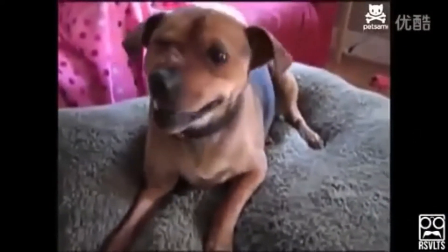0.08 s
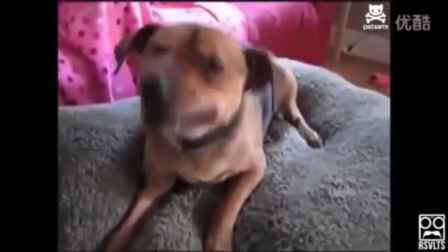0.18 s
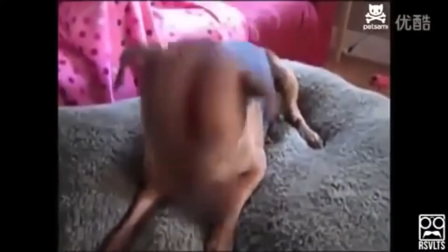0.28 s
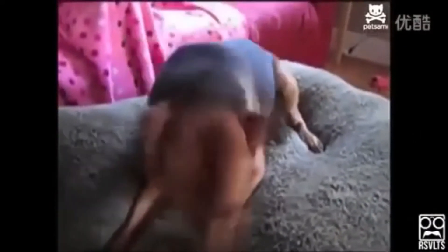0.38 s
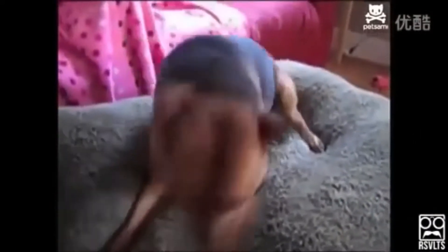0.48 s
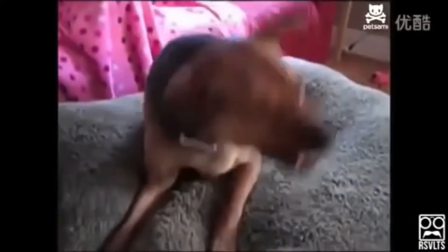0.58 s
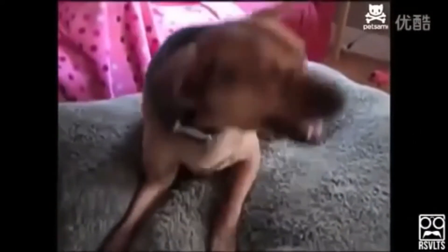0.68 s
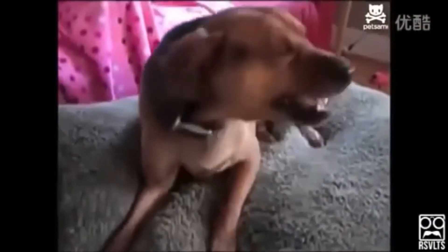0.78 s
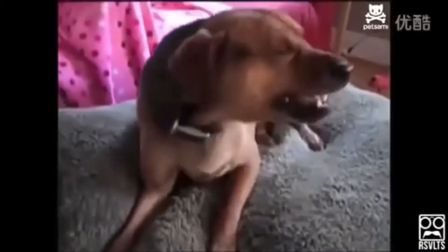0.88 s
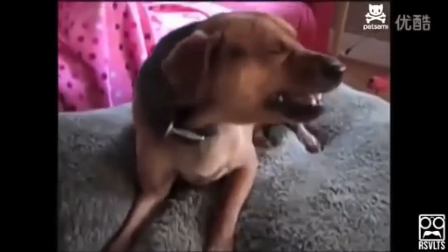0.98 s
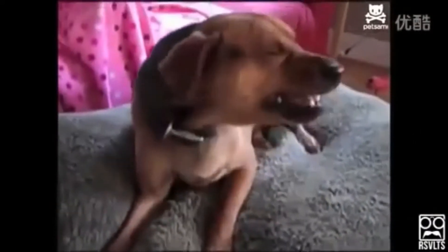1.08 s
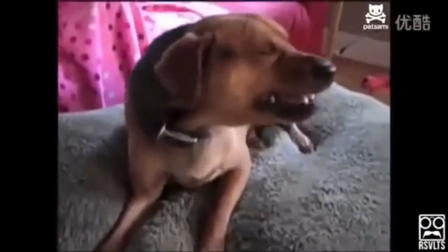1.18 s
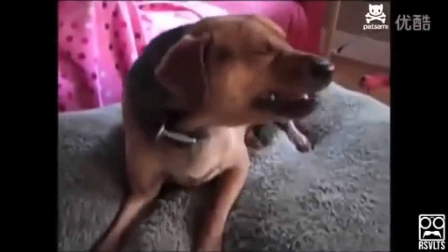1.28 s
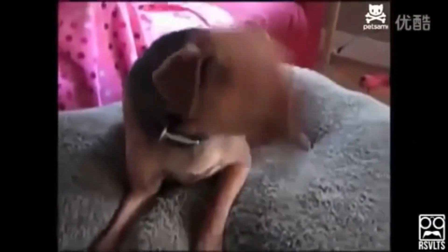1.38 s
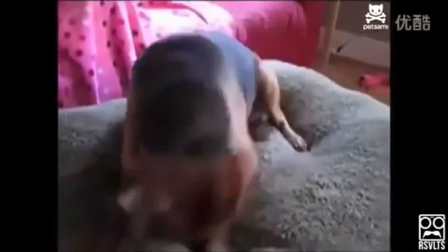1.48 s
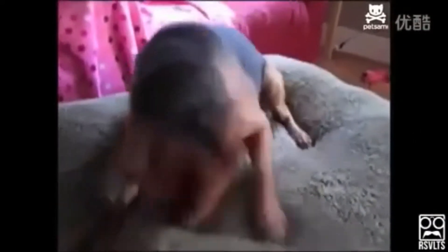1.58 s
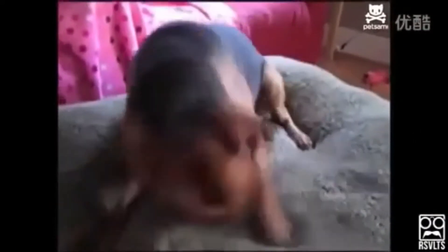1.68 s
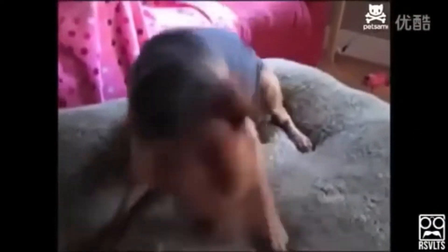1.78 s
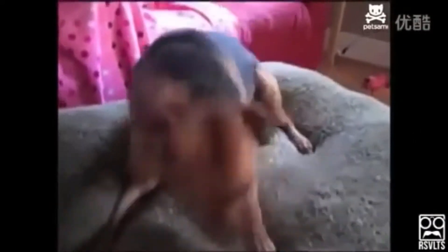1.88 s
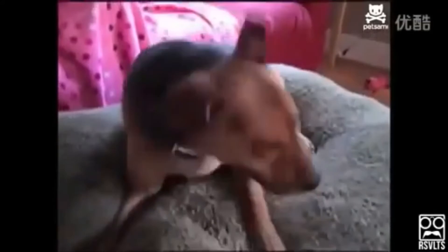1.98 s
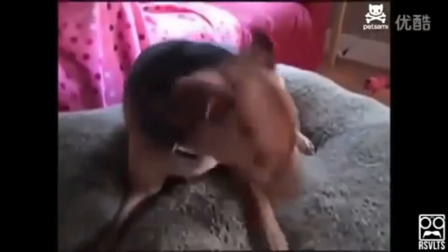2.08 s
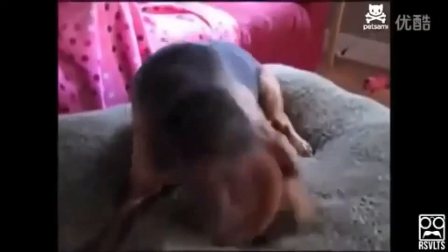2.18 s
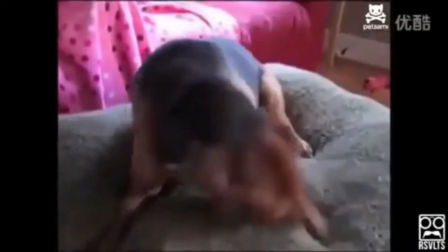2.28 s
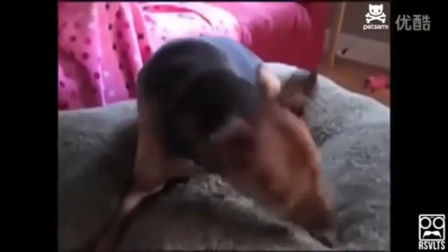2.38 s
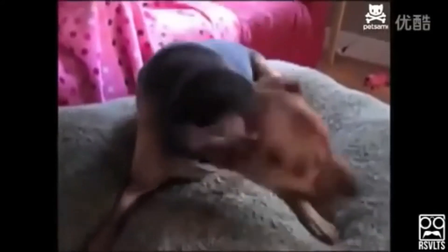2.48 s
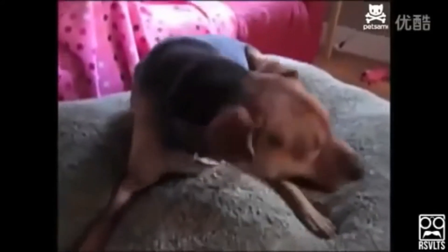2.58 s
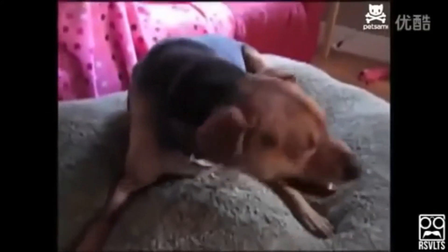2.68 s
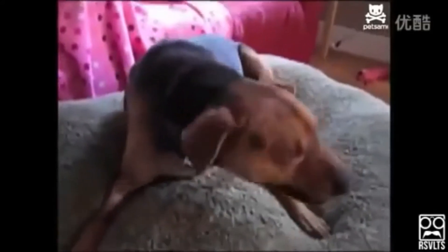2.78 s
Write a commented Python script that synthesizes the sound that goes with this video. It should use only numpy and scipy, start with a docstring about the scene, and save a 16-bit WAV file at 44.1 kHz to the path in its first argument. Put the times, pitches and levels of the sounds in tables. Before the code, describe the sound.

Close up in a quiet small room, a dog gives one breathy sneeze, pauses nearly a second, then blasts two more, each with a short grunt and wet lip flapping, ending in snuffles and a tooth click.

```python
"""A dog on a soft bed sneezes three times, close to the microphone in a small quiet room.
Each sneeze is noise for the air blast through muzzle and nose, chopped by the flutter of lips and throat;
a short grunt sounds soon after it starts, wet slaps ring the mouth and brief whistles sing in the air.
Around the blasts the dog sniffs and snuffles (swells of coloured noise), its teeth clack (clusters of
tiny ringing contacts) and its body bumps the bed (low noise), over a faint low room background."""
import sys
import numpy as np
from scipy import signal
from scipy.fft import rfft, irfft, next_fast_len
from scipy.io import wavfile
from scipy.ndimage import uniform_filter1d

SR = 44100
rng = np.random.default_rng(int(sys.argv[2]) if len(sys.argv) > 2 else 0)


def wrap_up_sound(samples):
    """Save the sound to the file named by the first command line argument, as 16-bit audio."""
    columns = np.atleast_2d(samples).T
    # keep every value between -1 and 1, then stretch to whole-number steps
    tamed = np.clip(columns, -1, 1)
    steps = np.round(tamed * 32767).astype(np.int16)
    wavfile.write(sys.argv[1], SR, steps)


N = 123480  # length of the scene in samples


def amp(db):
    """Decibels to gain."""
    return 10 ** (np.asarray(db) / 20)


def unit(x):
    """Scales to rms 1."""
    return x / np.sqrt(np.mean(x ** 2) + 1e-20)


def read(points, hz):
    """Reads a table on a log-frequency axis."""
    f, value = np.transpose(points)
    return np.interp(np.log(hz + 1), np.log(f + 1), value)


def add(mix, start, sound):
    """Mixes a sound in at a start time in seconds."""
    part = mix[max(round(start * SR), 0):][:len(sound)]
    part += sound[:len(part)]


def colour(x, points):
    """Causal minimum-phase filter with the given spectrum; the result has rms 1."""
    log_gain = np.log(amp(read(points, abs(np.fft.fftfreq(4096, 1 / SR)))))
    taps = np.fft.ifft(np.exp(np.conj(signal.hilbert(log_gain)))).real
    return unit(signal.fftconvolve(x, taps[:len(taps) // 2])[:len(x)])


def clock(length):
    """Sample times in seconds from zero up to length."""
    return np.arange(0, length, 1 / SR)


def noise(t):
    """White noise as long as t."""
    return rng.standard_normal(len(t))


def arch(t, skew=1):
    """A smooth swell and fall over t; skew under 1 peaks early."""
    return np.sin(np.pi * (np.arange(len(t)) / len(t)) ** abs(skew))


def steady(x, size=900):
    """Evens out slow chance swells, so that the air flow sets the level."""
    return x / np.sqrt(abs(uniform_filter1d(x ** 2, size)) + 1e-6)


def shifting(x, depth_db):
    """The passages change shape: patches about 500 Hz wide swell and sink within some 20 ms."""
    spectrogram = signal.stft(x, nperseg=256, noverlap=192)[2]
    field = rng.standard_normal(spectrogram.shape)
    field = uniform_filter1d(field, size=3, axis=0)
    field = unit(uniform_filter1d(field, size=14, axis=1))
    moved = signal.istft(spectrogram * amp(depth_db * field), nperseg=256, noverlap=192)[1]
    return steady(moved[:len(x)])


def ring(modes, size=2400):
    """Response of a set of modes to one tap, each a sine that dies away; peak 1."""
    t = np.arange(size) / SR
    out = sum(amp(db - 60 * t / t60) * np.sin(2 * np.pi * hz * t) for hz, db, t60 in modes)
    return out / abs(out).max()


def glide(t, first_hz, last_hz):
    """Phase in radians of a pitch that moves in a straight line."""
    return 2 * np.pi * np.cumsum(np.linspace(first_hz, last_hz, len(t))) / SR


def swell(start, length, db, spectrum):
    """A soft swell and fall of coloured noise."""
    t = clock(length)
    return start, amp(db) * arch(t) * colour(noise(t), spectrum)


def spread(middle, side, width):
    """Left and right from a middle and a side signal."""
    return np.array([middle + width * side, middle - width * side])


# Colour of the room's background. Each row: frequency in Hz, level in dB.
FLOOR_COLOUR = [(12, -59.5), (20, -37.5), (42, -25.5), (57, -6), (82, -3.5), (164, -14.5), (183, -11.5),
                (470, -17.5), (620, -19.5), (1170, -22), (2690, -36.5), (6530, -39), (7300, -41),
                (15000, -47.5)]
FLOOR_DB, FLOOR_WIDTH = -45.5, 0.12


def background():
    """The low, steady bed of noise in a quiet room, nearly the same left and right."""
    middle, side = [colour(z, FLOOR_COLOUR) for z in rng.standard_normal((2, N))]
    return amp(FLOOR_DB) * spread(middle, side, FLOOR_WIDTH)


# Faint puffs of air at the nostrils. Each row: start in seconds, length in seconds, level in dB.
SNIFFS = [(0.063, 0.031, -60.5), (0.1, 0.15, -48), (1.358, 0.073, -57.5)]
# Colour of the nose hiss, in sniffs and sneezes. Each row: frequency in Hz, level in dB.
NOSE_COLOUR = [(3500, -42), (4900, -11), (5500, -9), (6400, 0.5), (7300, -0.5), (8200, -3), (9100, -10),
               (10100, -14), (10700, -19.5), (12500, -21), (14500, -32)]


def sniff(start, length, db):
    """A little air hisses through the narrow nostrils."""
    return swell(start, length, db, NOSE_COLOUR)


# Snuffles around the sneezes.
# Each row: start in seconds, length in seconds, level in dB, brightness in dB per octave.
SNUFFLES = [(0.111, 0.19, -46, 2.5), (0.435, 0.095, -32.5, 2.5), (0.524, 0.099, -28.5, 0.1),
            (0.579, 0.29, -43, -2.5), (1.89, 0.22, -32, 0.6), (1.999, 0.25, -35, 1.5),
            (2.407, 0.18, -36.5, -0.5), (2.465, 0.14, -33, -0.6)]
# Colour of a snuffle before the brightness tilt. Each row: frequency in Hz, level in dB.
SNUFFLE_COLOUR = [(59, -26), (100, -3), (171, -6.5), (425, -1.5), (523, -7), (993, 1), (1270, -8),
                  (1920, -6), (2320, -0.5), (3730, -6.5), (5520, -8.5), (7850, -7), (14000, -38.5)]
TILT_PIVOT_HZ, SNUFFLE_SKEW, SNUFFLE_SHIFT_DB = 1000, 0.55, 2.7


def snuffle(start, length, db, tilt_db):
    """Air drawn softly through the wet muzzle."""
    t = clock(length)
    spectrum = [(hz, level + tilt_db * np.log2(hz / TILT_PIVOT_HZ)) for hz, level in SNUFFLE_COLOUR]
    air = shifting(colour(noise(t), spectrum), SNUFFLE_SHIFT_DB)
    return start, amp(db) * arch(t, SNUFFLE_SKEW) * air


# Wet slaps of the lips and jowls, and at 0.488 s the low knock of the jaw under a teeth clack, which rings the
# mouth the same way. Each row: start in seconds, peak level in dB.
SLAPS = [(0.117, -25.5), (0.2164, -19), (0.2327, -12.5), (0.3045, -13), (0.3241, -9.5), (0.356, -8),
         (0.362, -17), (.397, -12.5), (0.4227, -12.5), (.488, -18), (1.5321, -12.5), (1.547, -10),
         (1.560, -4), (1.61, -7.5), (1.6452, -5), (1.6563, -3.5), (1.7175, -8), (1.8007, -14.5),
         (2.255, -13), (2.272, -13.5), (2.282, -8), (2.353, -15.5)]
# Modes of the mouth at its middle size. Each row: frequency in Hz, level in dB, t60 in seconds.
MOUTH_MODES = [(169, -27.5, .03), (414, -7, 0.014), (754, -4, 0.0081), (1278, -2, 0.0033),
               (1800, -4, 0.017)]
SLAP_SOFT_S = 0.00047  # length of the soft landing
MOUTH_VARIATION = 0.094  # rms spread of each mode's pitch, as a log ratio


def slap(start, db):
    """Soft wet tissue lands and rings the mouth, a little differently each time."""
    ratios = np.exp(MOUTH_VARIATION * rng.standard_normal(len(MOUTH_MODES)))
    modes = [(hz * ratio, level, t60) for (hz, level, t60), ratio in zip(MOUTH_MODES, ratios)]
    sound = np.convolve(ring(modes), arch(clock(SLAP_SOFT_S)))
    return start, amp(db) * sound / abs(sound).max()


# Level curves, one table per sneeze. Each row: time in seconds, lip flutter in dB, throat rasp in dB,
# muzzle rush in dB, nose hiss in dB.
FIRST_SNEEZE = [(0.205, -45.5, -58, -42.5, -42), (0.235, -29, -30.5, -32.5, -29),
                (0.255, -28.5, -35.5, -19, -16), (0.279, -33, -34.5, -15.5, -12.5),
                (0.305, -24.5, -31, -16.5, -14), (0.33, -23.5, -31, -22, -19.5),
                (0.351, -39, -35.5, -25, -22), (0.355, -25, -23.5, -22.5, -23),
                (0.423, -33, -37, -30, -28.5), (0.443, -31.5, -49, -58, -41), (0.47, -44.5, -35, -31, -37)]
SECOND_SNEEZE = [(1.432, -48.5, -69, -61, -41), (1.452, -31, -76, -48, -43), (1.461, 3.5, -48, -32, -15.5),
                 (1.481, -1.5, -26, -27.5, -20), (1.506, -37.5, -33, -29.5, -28),
                 (1.511, -27.5, -22, -17, -14), (1.531, -17, -10.5, -21, -15),
                 (1.575, -21.5, -16.5, -23.5, -17.5), (1.594, -32.5, -26, -23.5, -14),
                 (1.632, -17, -27, -25.5, -18.5), (1.644, -19.5, -17.5, -20.5, -24),
                 (1.7, -22.5, -32, -30.5, -27.5), (1.722, -25.5, -24.5, -24, -20),
                 (1.794, -22, -35, -26.5, -26.5), (1.825, -27.5, -43, -26, -21.5),
                 (1.878, -37.5, -42, -27.5, -21), (1.895, -40, -48, -38, -31), (1.92, -47, -60, -45, -36)]
THIRD_SNEEZE = [(2.12, -50, -48, -28, -34), (2.134, -5, -45, -43, -29), (2.155, -28.5, -36, -25.5, -23),
                (2.174, -37, -28.5, -18, -14.5), (2.189, -23, -32, -18.5, -21), (2.205, -22, -38, -17, -12),
                (2.23, -23.5, -28, -20, -19.5), (2.249, -29, -28.5, -28, -18.5),
                (2.272, -20, -27, -22, -26.5), (2.296, -22.5, -26.5, -25, -21),
                (2.349, -32.5, -37.5, -28, -21), (2.39, -39, -46, -34, -35.5)]
# Flutter, one row per sneeze. Each row: pulses per second at the start and at the end, before jitter,
# fade-in of the lip flutter in seconds.
FLUTTER = [(148.34, 90, 0.087), (230.85, 95, 0.082), (169.7, 100, 0.035)]
# Colours of lips and throat. Each row: frequency in Hz, level in dB.
LIP_COLOUR = [(25, -44.5), (50, -29), (78, -0.5), (105, -2), (160, -6), (230, -1), (300, -4.5), (410, 5),
              (520, -6.5), (650, -6), (900, -11.5), (2000, -50.5)]
THROAT_COLOUR = [(350, -29), (620, -0.5), (880, 2), (1070, 1.5), (1200, -8.5), (1420, -2), (1750, -5),
                 (2100, -23), (3500, -36.5)]
# Colours of the muzzle rush, one list per sneeze. Each row: frequency in Hz, level in dB.
MUZZLE_COLOURS = [
    [(1060, -21), (1800, -5.5), (2430, -1), (2640, -7), (3260, -2), (3810, -9), (3900, -0.5), (4700, -1),
     (5400, -10), (7020, -27.5), (11900, -120)],
    [(1060, -32), (1800, -5), (2030, -4), (2240, -1.5), (2510, -1.5), (2840, 0.5), (3120, 2.5),
     (4270, -4.5), (5400, -0.5), (7020, -42), (11900, -120)],
    [(1060, -15), (1800, -10.5), (1970, -3), (2560, -3), (3050, -1), (3170, -3.5), (3440, -2), (3970, -5),
     (5400, -5), (7020, -13), (11900, -120)],
]
FLUTTER_JITTER, FLAP_VARIATION = .3, .35  # rms, as log ratios of rate and of flap strength
LIP_AIR, THROAT_AIR = 0.61, 0.9  # noise mixed with the flaps
LIP_DEPTH, THROAT_DEPTH, AIR_DEPTH = 2.7, 1.5, 0.25  # how far each puff lifts the noise
PUFF_DECAY_S, BLAST_EDGE_S = 0.0099, 0.0085
SHIFT_DB = 4.5  # how far the resonances of the wet passages come and go, rms
HISS_SHIFT_DB = 2  # the nose changes shape less than the mouth


def sneeze(curve, flutter, muzzle_colour):
    """Uneven flaps of soft tissue ring lips and throat, and chop the air rushing through muzzle and nose."""
    times, *levels = np.transpose(curve)
    t = np.arange(times[0], times[-1], 1 / SR)
    first_hz, last_hz, lip_fade_s = flutter
    jitter = unit(uniform_filter1d(noise(t), size=200))
    rate = np.geomspace(first_hz, last_hz, len(t)) * np.exp(FLUTTER_JITTER * jitter)
    turns = np.cumsum(rate) / SR
    # one click per turn, each of a different strength
    flaps = unit(np.diff(np.floor(turns), prepend=0) * np.exp(FLAP_VARIATION * noise(t)))
    puffs = np.exp(-(turns % 1) / rate / PUFF_DECAY_S)

    def chopped(depth):
        """Air noise that jumps up with each flap and dies away."""
        return unit((1 + depth * puffs) * noise(t))

    lip_fade = np.clip((t - t[0]) / lip_fade_s, 0, 1) ** 4
    lips = steady(colour(flaps + LIP_AIR * chopped(LIP_DEPTH), LIP_COLOUR)) * lip_fade
    throat = shifting(colour(flaps + THROAT_AIR * chopped(THROAT_DEPTH), THROAT_COLOUR), SHIFT_DB)
    rush = shifting(colour(chopped(AIR_DEPTH), muzzle_colour), SHIFT_DB)
    hiss = shifting(colour(chopped(AIR_DEPTH), NOSE_COLOUR), HISS_SHIFT_DB)
    parts = lips, throat, rush, hiss
    blast = sum(part * amp(np.interp(t, times, db)) for part, db in zip(parts, levels))
    edges = np.minimum(np.minimum(t - t[0], t[-1] - t) / BLAST_EDGE_S, 1)
    return times[0], edges * blast


# Soft bumps on the bed. Each row: start in seconds, length in seconds, level in dB.
BUMPS = [(0.214, 0.089, -33), (0.461, 0.076, -39.5), (0.641, 0.066, -50), (1.057, 0.13, -45.5),
         (1.761, 0.095, -27), (2.265, 0.058, -38), (2.61, 0.17, -43.5)]
# Colour of the bed. Each row: frequency in Hz, level in dB.
BED_COLOUR = [(25, -33), (50, -14), (72, -1), (110, -6.5), (170, -20.5), (400, -37), (1500, -49.5)]


def bump(start, length, db):
    """The soft bed gives way under the body with a low, dull swell."""
    return swell(start, length, db, BED_COLOUR)


# Fuzzy whistles in the air stream. Each row: start in seconds, length in seconds, start pitch in Hz,
# end pitch in Hz, width in Hz, level in dB.
WHISTLES = [(0.234, 0.017, 4710, 5340, 500, -28), (.238, 0.031, 1900, 1710, 111, -21.5),
            (0.251, 0.039, 4900, 4200, 560, -12), (0.277, 0.042, 5200, 5700, 600, -19.5),
            (.32, 0.022, 1410, 1760, 164, -19), (1.271, 0.029, 6580, 7480, 593, -59.5),
            (1.52, 0.072, 900, 950, 120.4, -22), (1.528, 0.015, 1810, 1700, 160, -20.5),
            (1.562, 0.03, 1080, 1300, 100, -21.5), (1.924, 0.12, 3300, 2914, 700, -31),
            (2.116, 0.012, 3000, 3210, 220, -22.5), (2.19, 0.042, 2900, 2300, 302, -26.5),
            (2.28, 0.032, 710, 835, 166.7, -22)]


def whistle(start, length, first_hz, last_hz, width_hz, db):
    """A narrow gap makes the air sing briefly around a gliding pitch."""
    t = clock(length)
    pole = np.exp(-2 * np.pi * abs(width_hz) / SR)
    # slow complex noise blurs the pitch on both sides
    wander = signal.lfilter([1], np.poly([pole, pole]), noise(t) + 1j * noise(t))
    tone = (wander * np.exp(1j * glide(t, first_hz, last_hz))).real
    return start, amp(db) * arch(t) * unit(tone)


# Grunts as the throat opens. Each row: start in seconds, length in seconds, start pitch in Hz,
# end pitch in Hz, level of the fundamental in dB.
GRUNTS = [(.235, 0.037, 174, 156.2, -25.5), (1.463, 0.016, 407, 250, -9.5), (1.482, 0.092, 277, 260, -26),
          (2.141, 0.028, 388, 464, -19), (2.145, 0.036, 222, 221, -18), (2.514, 0.016, 344, 319.5, -32)]
GRUNT_OVERTONE_DB, GRUNT_SKEW = -25.5, 0.77


def grunt(start, length, first_hz, last_hz, db):
    """A few nearly pure cycles from the throat behind a shut mouth."""
    t = clock(length)
    phase = glide(t, first_hz, last_hz)
    tone = np.sin(phase) + amp(GRUNT_OVERTONE_DB) * np.sin(2 * phase)
    return start, amp(db) * arch(t, GRUNT_SKEW) * tone


# Teeth clacks. Each row: start in seconds, level in dB, length of the chatter in seconds, its skew,
# brightest frequency in Hz, its lift in dB, lower band edge in Hz, level sent to the room in dB.
CLACKS = [(0.487, -20, 0.0083, .6, 5200, 2, 3050, -9.5),
          (.6208, -16.5, 0.0084, 0.51, 7700, 8.5, 3900, -8.5),
          (2.0225, -21, 0.012, 0.53, 7600, 7, 2320, -11.5), (2.3975, -16, 0.01, 0.31, 7350, 0.5, 1870, -14),
          (2.5396, -17.5, 0.0073, 0.86, 5360, 13, 4000, -18)]
# Modes of the teeth before the lift. Each row: frequency in Hz, level in dB, t60 in seconds.
TEETH_MODES = [(2280, -6, 0.0028), (3450, -5.5, 0.0065), (4730, -20, 0.0057), (5344, 2.5, 0.0065),
               (6400, 3, 0.0038), (7200, 7, 0.0029), (7940, 5.5, 0.0042), (9450, -2.5, 0.012),
               (9850, -2.5, 0.014), (14000, -7, .008)]
CONTACTS_PER_S, TEETH_OVERTONE, TEETH_TOP_HZ = 6000, 1.98, 12930  # the overtone is a frequency ratio
FOCUS_OCTAVES = .17  # half-width of the lifted region


def clack(start, db, length, skew, bright_hz, lift_db, low_hz):
    """Teeth meet in contacts milliseconds apart or less, each ringing very briefly; level is over 10 ms."""
    t = clock(length)
    hits = rng.random(len(t)) < CONTACTS_PER_S / SR
    contacts = np.sign(noise(t)) * arch(t, skew) ** 2 * hits

    def focus(hz):
        """Closeness to the brightest frequency, 1 at its centre."""
        return np.exp(-(np.log2(hz / bright_hz) / FOCUS_OCTAVES) ** 2)

    modes = [(hz, level + lift_db * (focus(hz) + focus(hz / TEETH_OVERTONE)), t60)
             for hz, level, t60 in TEETH_MODES]
    band = signal.butter(N=3, Wn=[low_hz, TEETH_TOP_HZ], btype="band", fs=SR)
    sound = signal.lfilter(*band, np.convolve(contacts, ring(modes)))
    return start, amp(db) * sound / np.linalg.norm(sound) * np.sqrt(SR / 100)


# Side sound from nearby surfaces, relative to the direct sound. Each row: frequency in Hz, level in dB.
NEAR_SIDE = [(80, -31), (300, -15.5), (1000, -37), (2200, -37.5), (4200, -28), (8000, -21), (13000, -30)]
NEAR_S = .004


def nearby(x):
    """Surfaces close to the dog answer within a few milliseconds, differently left and right."""
    taps = rng.standard_normal(round(NEAR_S * SR))
    size = next_fast_len(N + len(taps))
    gain = amp(read(NEAR_SIDE, np.fft.rfftfreq(size, 1 / SR)))
    echo = rfft(taps / np.linalg.norm(taps), size) * gain
    side = irfft(rfft(x, size) * echo, size)[:N]
    return spread(x, side, 1)


# Decay of the room. Each row: frequency in Hz, t60 in seconds.
ROOM_DECAY = [(150, 0.38), (500, 0.62), (950, 0.51), (2500, 0.61), (4200, 0.32), (5500, 0.35), (6700, 0.31),
              (8000, 0.44), (14000, 0.12)]
DOG_TO_ROOM_DB, ROOM_WIDTH = -12.5, .3


def room(x):
    """Dense reflections that die away band by band."""
    taps = rng.standard_normal((2, SR // 2)) * (rng.random((2, SR // 2)) < .1)
    taps[:, :round(.004 * SR)] = 0  # a short gap before the first reflections
    hz, t, spectrogram = signal.stft(taps, SR, nperseg=256)
    decay = amp(-60 * t / read(ROOM_DECAY, hz)[:, None])
    tail = signal.istft(spectrogram * decay, SR, nperseg=256)[1]
    middle, side = signal.fftconvolve(x[None], tail / np.linalg.norm(tail[0]), axes=1)[:, :N]
    return spread(middle, side, ROOM_WIDTH)


LEFT_DB = .7  # left level over right


def scene():
    """The dog slightly left of centre, the room's answer and its low background."""
    dog, teeth, teeth_to_room = np.zeros((3, N))
    for row in zip([FIRST_SNEEZE, SECOND_SNEEZE, THIRD_SNEEZE], FLUTTER, MUZZLE_COLOURS):
        add(dog, *sneeze(*row))
    for source, rows in ((sniff, SNIFFS), (snuffle, SNUFFLES), (slap, SLAPS), (bump, BUMPS),
                         (whistle, WHISTLES), (grunt, GRUNTS)):
        for row in rows:
            add(dog, *source(*row))
    for *row, room_db in CLACKS:
        start, sound = clack(*row)
        add(teeth, start, sound)
        add(teeth_to_room, start, amp(room_db) * sound)
    close = nearby(dog + teeth)
    reverb = room(amp(DOG_TO_ROOM_DB) * dog + teeth_to_room)
    balance = amp([[LEFT_DB / 2], [-LEFT_DB / 2]])
    return (close + reverb + background()) * balance


LOW_CUT_HZ, EDGE_HZ, CEILING = 22, 14900, .95


def record(dry):
    """The microphone drops the deepest bass and the loudest peaks clip; then the band limit."""
    x = signal.lfilter(*signal.butter(2, LOW_CUT_HZ, "high", fs=SR), dry)
    taps = signal.firwin(401, EDGE_HZ, window=("kaiser", 8), fs=SR)
    return signal.oaconvolve(np.clip(x, -CEILING, CEILING), taps[None], "same", axes=1)


dry = scene()
out = record(dry)
wrap_up_sound(out)
```